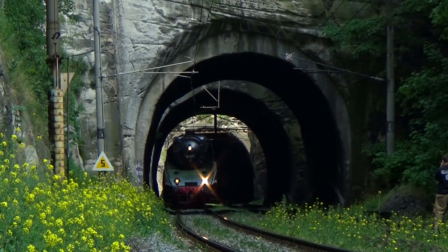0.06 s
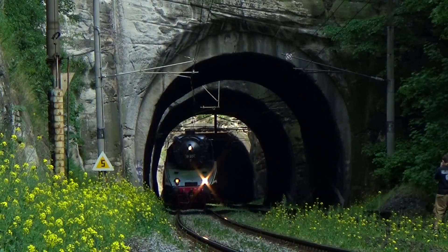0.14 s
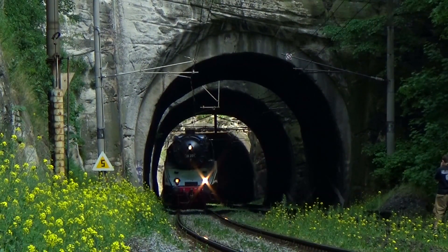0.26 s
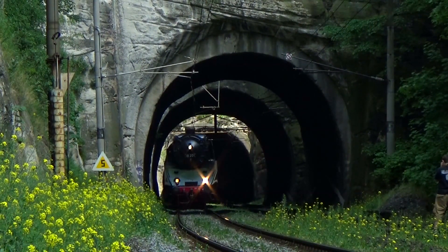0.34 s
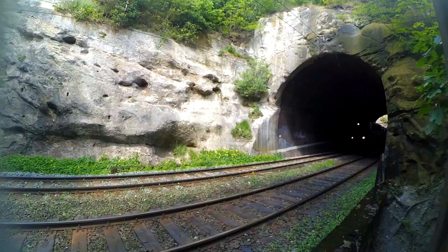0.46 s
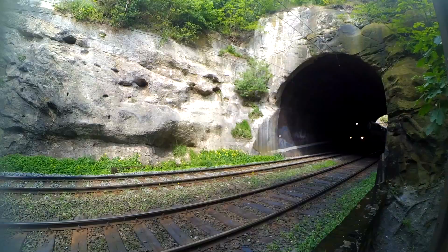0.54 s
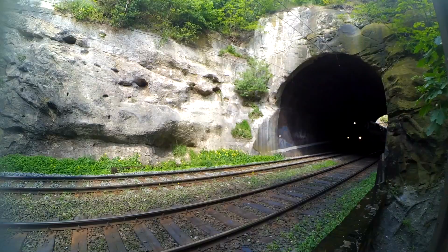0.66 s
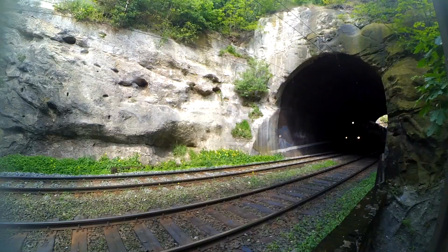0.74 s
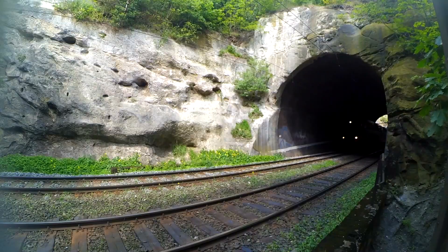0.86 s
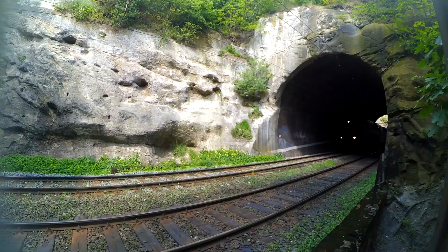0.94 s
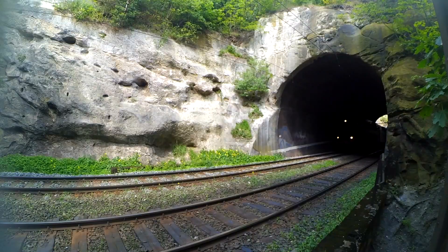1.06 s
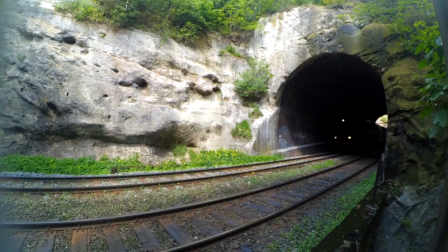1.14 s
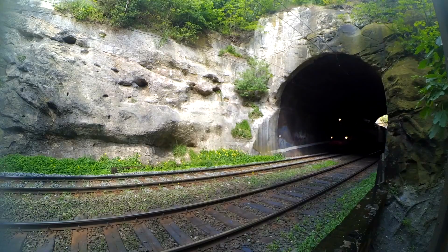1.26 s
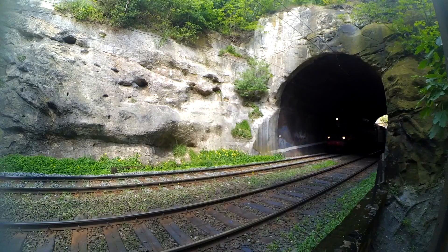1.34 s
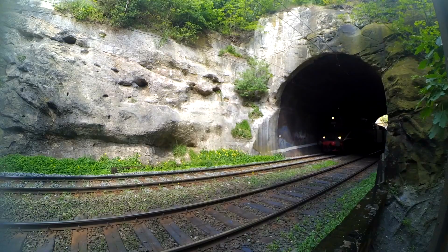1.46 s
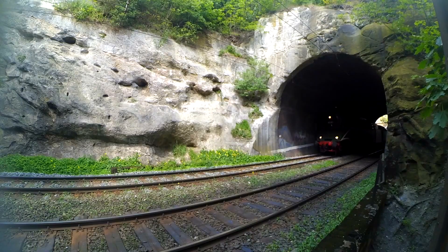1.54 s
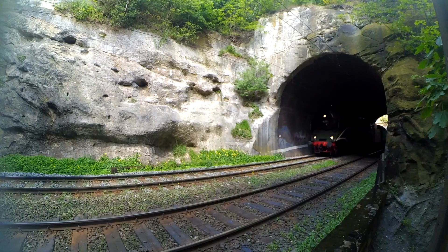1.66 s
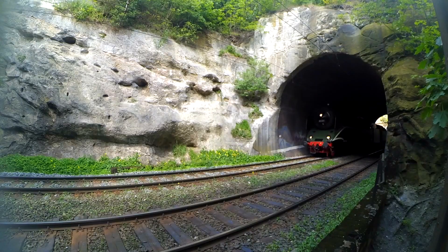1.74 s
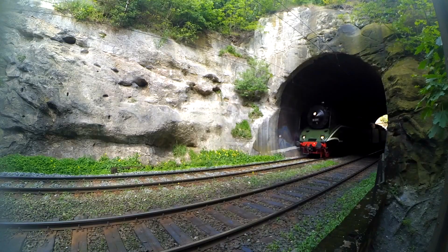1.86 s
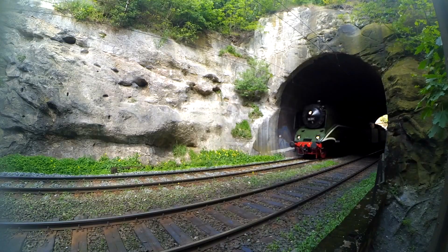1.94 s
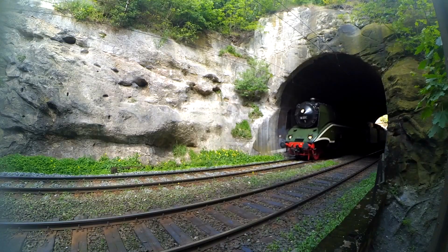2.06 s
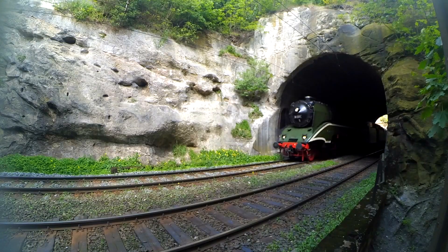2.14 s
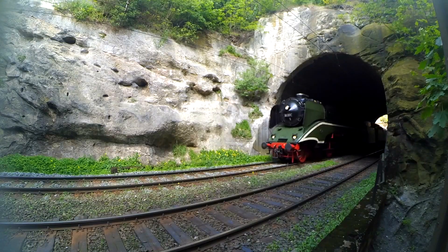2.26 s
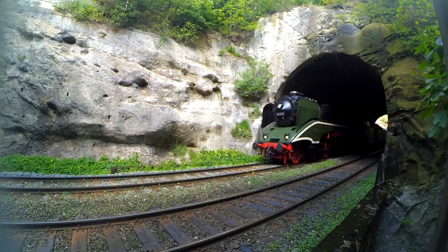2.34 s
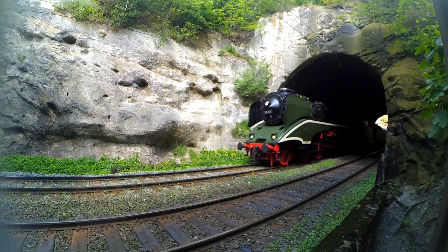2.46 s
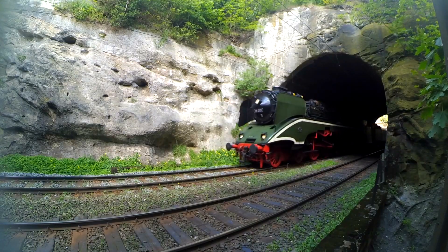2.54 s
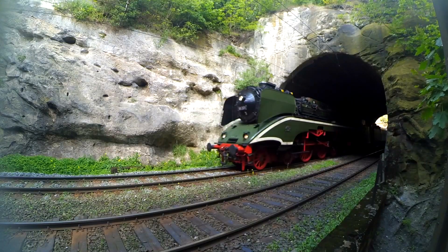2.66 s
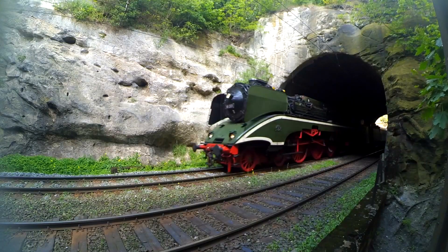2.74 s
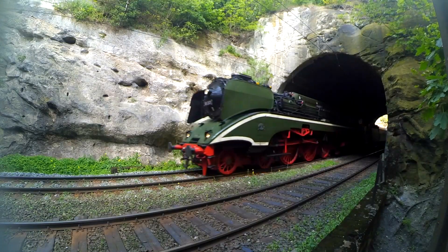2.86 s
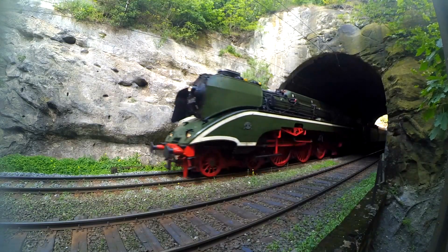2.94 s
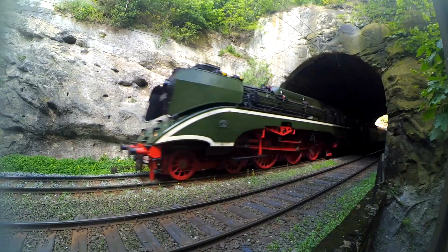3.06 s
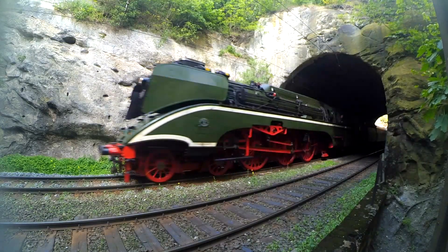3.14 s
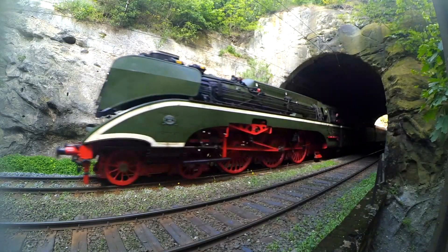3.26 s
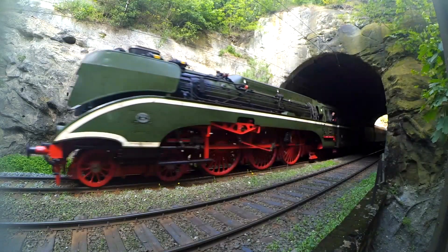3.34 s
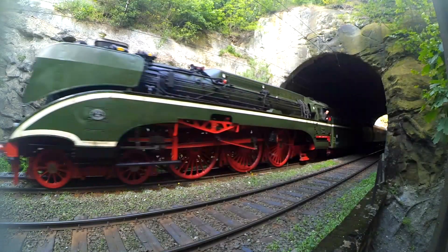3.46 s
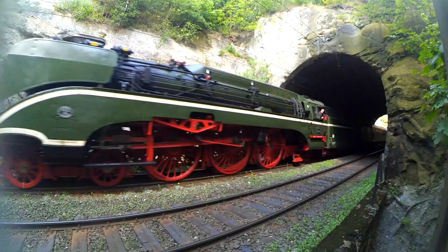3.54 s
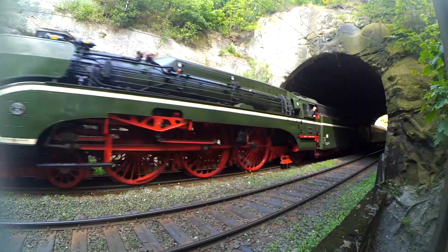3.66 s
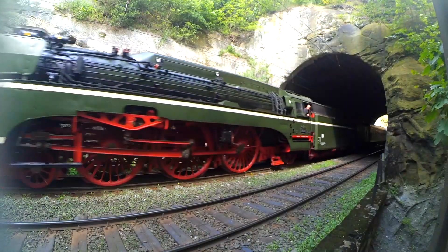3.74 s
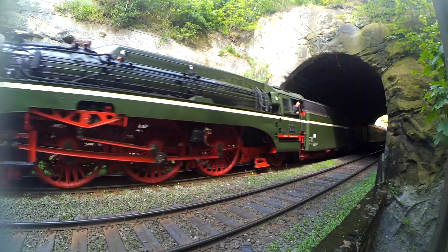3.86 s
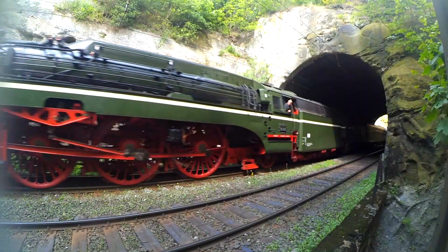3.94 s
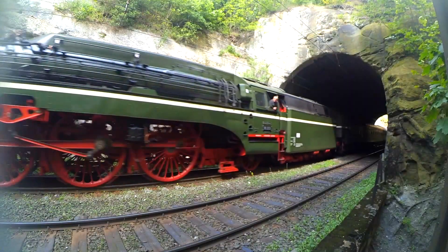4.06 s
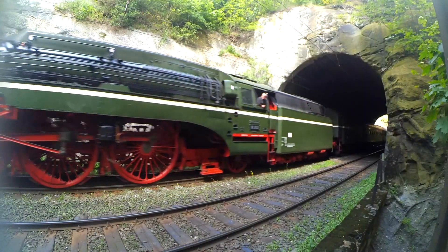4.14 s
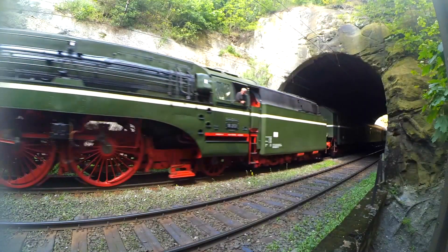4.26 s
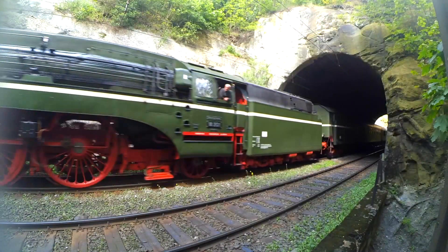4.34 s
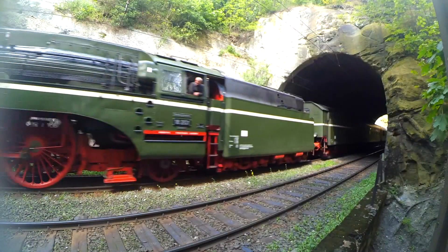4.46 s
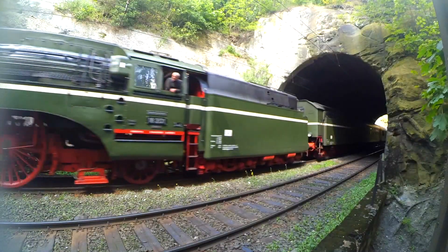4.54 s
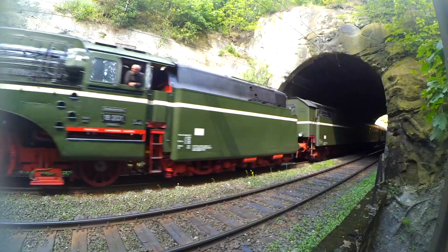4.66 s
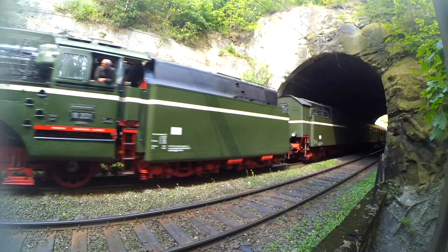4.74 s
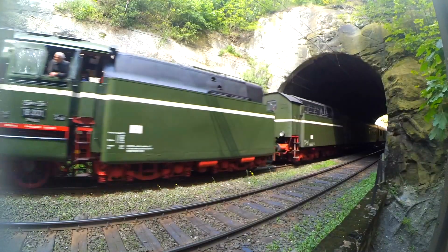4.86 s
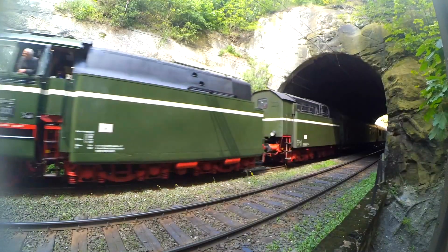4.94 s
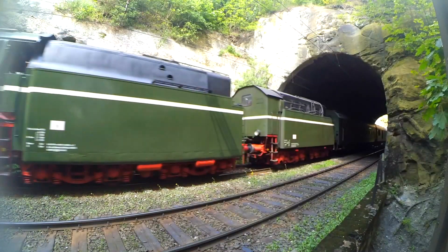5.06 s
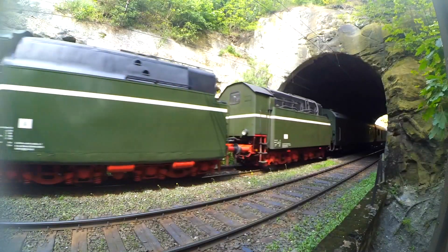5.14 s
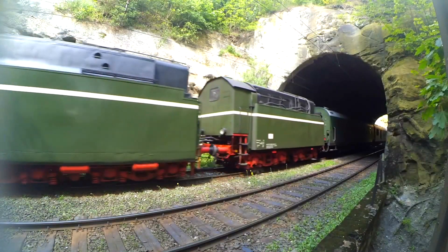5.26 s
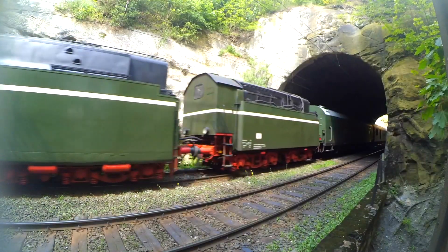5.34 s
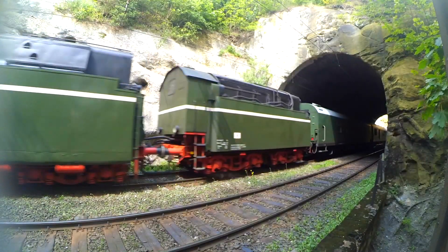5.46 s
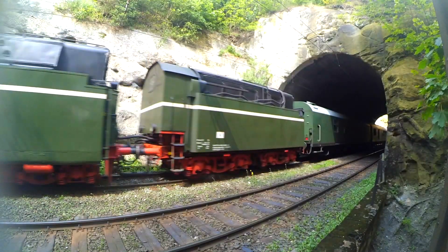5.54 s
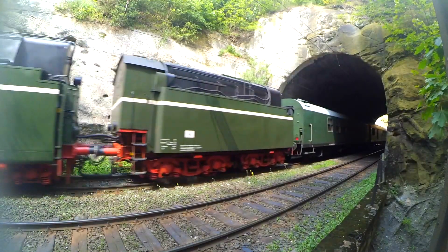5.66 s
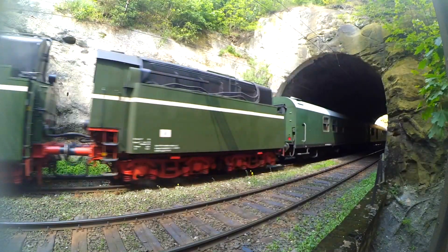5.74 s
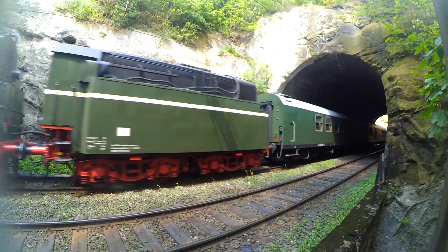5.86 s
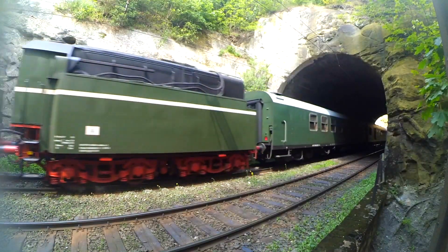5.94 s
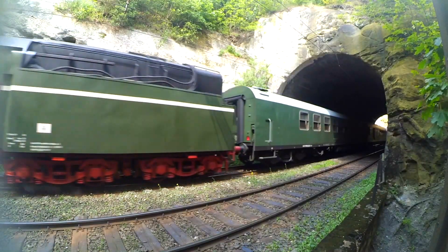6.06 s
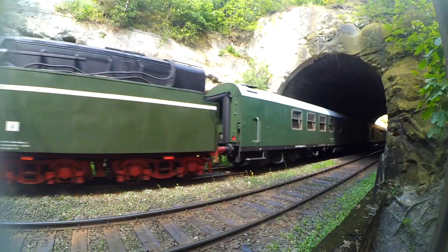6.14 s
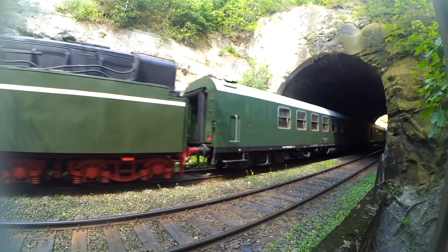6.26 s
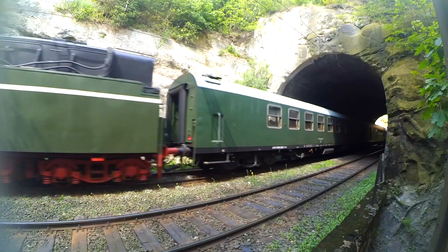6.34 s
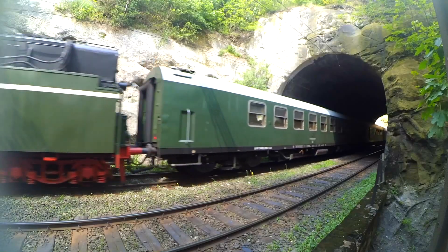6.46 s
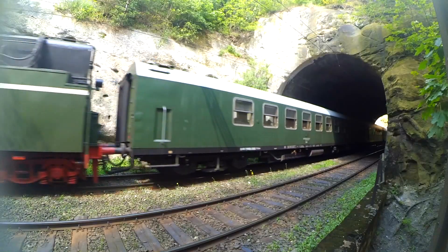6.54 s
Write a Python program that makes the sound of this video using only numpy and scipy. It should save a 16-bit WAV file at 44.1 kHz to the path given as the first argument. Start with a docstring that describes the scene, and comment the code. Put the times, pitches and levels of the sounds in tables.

```python
"""Half a second of open air with a bird, then a cut to a small camera in a closed plastic case beside the track.
A steam train rolls out of a rock tunnel and passes: a deep rumble, steam puffs, roar and hiss of wheels.
The rumble is noise in the case's low resonances; steam and wheels are noise shaped by its higher peaks.
As the tenders pass, a swelling sine makes the case boom, and impulses ring it as it chatters on its mount.
The bird whistles on over the train, as gliding tones with a noise echo."""
import sys
import numpy as np
from scipy import signal
from scipy.fft import rfft, irfft
from scipy.io import wavfile
from scipy.ndimage import uniform_filter1d

SR = 44100
rng = np.random.default_rng(int(sys.argv[2]) if len(sys.argv) > 2 else 0)


def put_to_file(sound):
    """Save the sound as 16-bit audio at rate SR, in the file named by the first command-line argument."""
    columns = np.atleast_2d(sound).T  # one column per channel
    safe = np.clip(columns, -1, 1)
    whole_steps = np.round(safe * 32767)
    wavfile.write(sys.argv[1], SR, whole_steps.astype(np.int16))


N = 291060
TIME, FREQ = np.arange(N) / SR, np.fft.rfftfreq(N, 1 / SR)

CUT_S = 0.478  # the open-air view gives way to the cased camera beside the track
BOOM_HZ, BOOM_TROUGH_S = 78.7, 5.635  # pitch of the boom, and the time of one of its troughs
# ground shaking, which jumps as the engine clears the tunnel: time_s, level_db against the close pass
GROUND_SHAKE = [(.48, -21.5), (1.2, -17.5), (2.0, -14.5), (2.74, -11.5), (2.8, -5.5), (3.5, -2.5),
                (4.2, -1.5), (5.0, 0), (6.05, 1.5), (6.6, -2)]
# swell of the case's boom: time_s, rms level_db
BOOM_SWELL = [(5.19, -33), (5.24, -27.5), (5.41, -22.5), (5.5, -23.5), (5.6, -19), (5.78, -25), (5.83, -33),
              (5.9, -35)]
# hard jolts that set the case chattering: start_s, force_db, rebound_loss_db
HARD_JOLTS = [(3.6, -38, 15), (3.669, -38.5, 13), (3.865, -36, 10), (4.635, -40, 11), (4.765, -32, 12),
              (4.963, -22.5, 18), (5.255, -31, 4), (5.317, -28, 16), (5.341, -26.5, 5), (5.392, -22.5, 5),
              (5.443, -22, 2.5), (5.532, -20, 4), (5.582, -21.5, 1), (5.659, -22.5, 2), (5.722, -19, 10),
              (5.761, -22, 5), (5.798, -24.5, 5), (5.852, -27, 6), (5.915, -26, 14), (5.991, -28.5, 19),
              (6.144, -31.5, 2.5), (6.192, -32.5, 11), (6.269, -32.5, 3)]


def amp(db):
    """Decibels to gain."""
    return 10 ** (np.asarray(db) / 20)


def unit(x):
    """Scales to rms 1."""
    return x / np.sqrt(np.mean(x ** 2) + 1e-20)


def level(rows, axis=1):
    """One dB column of a curve over time, as a gain at every sample."""
    rows = np.array(rows)
    return amp(np.interp(TIME, rows[:, 0], rows[:, axis]))


def colour(points):
    """A spectrum as a gain at every frequency, joined along a log pitch axis."""
    hz, db = np.transpose(points)
    return amp(np.interp(np.log(FREQ + 1), np.log(hz + 1), db))


def resonances(modes):
    """Gain of a set of steep-sided resonances, summed in power."""
    power = 0
    for hz, width, db in modes:
        power = power + (amp(db) / (1 + (2 * (FREQ - hz) / width) ** 2)) ** 2
    return np.sqrt(power)


def band(centre_hz, width_hz):
    """Gain of a bell-shaped band, down to 1/e at width_hz from its centre."""
    return np.exp(-((FREQ - centre_hz) / width_hz) ** 2)


def noise(gain):
    """Noise of rms 1 with the given spectrum."""
    return unit(irfft(rfft(rng.standard_normal(N)) * gain, N))


def flutter(rate_hz, depth_db):
    """A random wavering gain: slow noise, depth_db rms, moves the level."""
    return amp(depth_db * noise(band(0, rate_hz)))


def steady(x, size):
    """Evens out slow swells over a window of size samples, keeping the fast beats."""
    power = uniform_filter1d(uniform_filter1d(x ** 2, size), size)
    return x / np.sqrt(power + 1e-6)


def add(mix, s, sound):
    """Mixes a sound in at time s."""
    part = mix[max(round(s * SR), 0):][:len(sound)]
    part += sound[:len(part)]


def case():
    """Gain of the plastic shell on steam and wheels: its peaks add up in dB."""
    # peaks of the shell: pitch_hz, width_hz, gain_db
    shell_peaks = [(540, 5.7, 6.5), (820, 17, 7), (983, 64, 14.5), (1207, 55, 8), (1375, 100, 10.5),
                   (1941, 187, 14.5), (2292, 170, 10), (2716, 148, 9), (3030, 424, 8), (3816, 270, 7.5),
                   (4750, 160, 5.5), (5225, 190, 6), (6800, 400, 8.5), (7640, 280, 5), (8760, 315, 3),
                   (10800, 440, -0.5)]
    return amp(sum(db * band(hz, width) for hz, width, db in shell_peaks))


def open_air(air_db=-51):
    """The air of the place before the cut: steady noise, strongest in the bass."""
    # spectrum of the open air: pitch_hz, relative_db per Hz
    air_spectrum = [(15, -52), (25, -16), (55, -1.5), (99, -22), (152, -17), (253, -6), (803, -6.5),
                    (1710, -11.5), (2010, -13), (2420, -12), (3530, -21.5), (4740, -23.5), (6730, -28.5),
                    (9040, -30), (15500, -38)]
    return amp(air_db) * noise(colour(air_spectrum))


def birds(echo_db=-4, echo_t60=0.65, waver=0.0071):
    """Thin gliding whistles with a slightly wavering pitch, smeared by the rock face as a decaying noise tail."""
    # whistles: start_s, length_s, start_hz, middle_hz, end_hz, level_db
    whistles = [(.24, 0.064, 5880, 5300, 4900, -67), (0.256, 0.1, 5230, 4660, 5020, -63),
                (0.336, 0.074, 5030, 4680, 4570, -70), (0.5, 0.1, 2820, 3020, 3250, -64),
                (0.688, 0.121, 5200, 5160, 5080, -60.5), (1.218, 0.133, 5160, 5080, 5040, -65),
                (1.762, 0.19, 5120, 5070, 5100, -64), (1.985, .06, 6700, 6530, 6300, -66),
                (2.07, 0.06, 3990, 3970, 4000, -61), (2.785, 0.088, 5220, 5180, 5130, -65)]
    out, wobble = np.zeros(N), noise(band(0, 120))
    for s, length, first, middle, last, db in whistles:
        u = np.linspace(0, 1, round(length * SR))
        glide = np.interp(u, [0, .5, 1], [first, middle, last])
        hz = glide * (1 + waver * wobble[round(s * SR):][:len(u)])
        tone = np.sqrt(2) * np.sin(2 * np.pi * np.cumsum(hz) / SR)
        add(out, s, amp(db) * signal.windows.tukey(len(u), .7) * tone)
    tail = rng.standard_normal(SR // 2) * amp(-60 * TIME[:SR // 2] / echo_t60)
    echo = signal.oaconvolve(out, tail / np.linalg.norm(tail))[:N]
    return out + amp(echo_db) * echo


def pips(pip_db=-74.5, pip_hz=11020, width_hz=380, half_length=0.018, stray_s=0.013):
    """A faint high fizz, a narrow noise band, comes and goes about six times a second."""
    first_s, period_s = .6, .16
    beats = np.arange(first_s, N / SR, period_s)
    beats = beats + stray_s * rng.standard_normal(len(beats))
    gate = sum(np.exp(-((TIME - s) / half_length) ** 2) for s in beats)
    return amp(pip_db) * gate * noise(band(pip_hz, width_hz))


def flanges(width_hz=90):
    """The flanges rub the curved rail and ring faintly: narrow noise bands that swell and fade."""
    # thin squeals of wheel flanges in the curve: middle_s, half_length_s, pitch_hz, level_db
    squeals = [(4.55, 0.33, 8080, -69.5), (4.44, .06, 12500, -73), (4.45, .06, 14200, -73),
               (4.2, .06, 14200, -79), (4.72, .12, 14100, -82), (6.28, 0.11, 13550, -81)]
    out = np.zeros(N)
    for s, half, hz, db in squeals:
        swell = np.exp(-((TIME - s) / half) ** 2)
        out += amp(db) * swell * noise(band(hz, width_hz))
    return out


def steam():
    """Short spluttering puffs: cuts of one jet of noise, heard through the shell, that swell and die."""
    # puffs: peak_s, level_db, rise_s, decay_s, low_edge_hz
    puffs = [(.915, -46.5, .03, 0.13, 2630), (1.149, -49, 0.01, 0.032, 2800),
             (1.195, -46.5, 0.011, 0.051, 2830), (1.24, -48, 0.02, 0.077, 2950),
             (1.47, -57, 0.052, .05, 2830), (1.525, -56.5, 0.027, 0.13, 2800),
             (3.345, -51, 0.027, 0.067, 2370), (3.41, -52.5, 0.018, 0.029, 2400),
             (3.76, -54, 0.015, 0.018, 890), (4.2, -42.5, 0.033, 0.051, 830)]
    # spectrum of the jet ahead of the shell: pitch_hz, relative_db per Hz
    jet_spectrum = [(800, 5.5), (2000, -1.5), (3000, 1), (3700, 7), (4300, 2.5), (4900, 3.5), (6500, -2.5),
                    (8000, -9.5), (10000, -16.5), (14500, -24)]
    out, jet = np.zeros(N), rfft(rng.standard_normal(N)) * colour(jet_spectrum) * case()
    for s, db, rise, decay, low_hz in puffs:
        before, after = np.minimum(TIME - s, 0), np.maximum(TIME - s, 0)
        shape = np.exp(-(before / rise) ** 2 - after / decay)
        high_pass = 1 / np.sqrt(1 + (low_hz / (FREQ + 1)) ** 14)
        puff = unit(irfft(jet * high_pass, N))
        out += amp(db) * shape * np.roll(puff, rng.integers(N))  # each puff takes another stretch of the jet
    return out * flutter(120, 1.2)


def wheels(roar_db=-50.5, singing_db=-55.0, hiss_db=-52, hiss_follow=0.72):
    """Rough wheels on steel, through the shell: an uneven roar, the singing of the rails and a wide hiss."""
    # the train nears on the rails: time_s, rolling_db, singing_db, both against the close pass
    approach = [(.48, -12.5, -9), (1.3, -10, -8), (2.4, -9, -9), (2.85, -6, -4.5), (3.7, -1.5, .5),
                (4.5, -1.5, -.5), (5.1, -1, -2.5), (5.6, 0.5, 2), (6.0, 0, -2), (6.6, -0.5, -0.5)]
    # spectra ahead of the shell: pitch_hz, relative_db per Hz
    roar_spectrum = [(120, 2), (200, -1.5), (330, 1), (410, -2), (470, -5.5), (700, -8), (900, -16.5),
                     (1300, -47)]
    singing_spectrum = [(600, 4), (900, -2.5), (1100, 3.5), (1650, 3), (2100, -49)]
    hiss_spectrum = [(1300, -18), (1800, -1), (2500, 2.5), (3500, 1.5), (6000, -2.5), (8000, -7),
                     (10000, -9.5), (12500, -15), (14800, -19), (15600, -33)]
    shell, roll = case(), level(approach)
    roar = amp(roar_db) * roll * noise(colour(roar_spectrum) * shell) * flutter(28, 1.9)
    rails = noise(colour(singing_spectrum) * shell) * flutter(27, 0.18)
    singing = amp(singing_db) * level(approach, axis=2) * rails
    hiss = amp(hiss_db) * roll ** hiss_follow * noise(colour(hiss_spectrum) * shell) * flutter(30, 0.64)
    return roar + singing + hiss


def rumble(sway_db=-39.5, sway_follow=0.61, main_db=-33.5, main_follow=1.15,
           box_db=-34.0, box_under_boom_db=-6, handover_db=-28):
    """Ground and air shake the case; its low resonances beat, until the main one takes over as a boom."""
    # low resonances of case and mount, and of a wavering hum: pitch_hz, width_hz, relative_db
    sway_mode = [(51.4, 14.7, 0)]
    main_mode = [(76.9, 12.1, 0)]
    box_modes = [(94.1, 14.5, 1), (105.4, 11.4, -0.5), (133, 44, -23), (141, 21, -20), (163.3, 20, -20),
                 (222, 13.3, -23.5)]
    hum_mode = [(260.6, 19, 0)]
    # level of the hum: time_s, level_db
    hum_level = [(.48, -81), (1.25, -67), (2.35, -66.5), (2.55, -56), (4.2, -57), (6.6, -57.5)]
    shake = level(GROUND_SHAKE)
    sway = steady(noise(resonances(sway_mode)), size=3500) * flutter(4.7, 1.57)
    sway *= amp(sway_db) * shake ** sway_follow
    booming = (TIME > BOOM_SWELL[0][0]) * (TIME < BOOM_SWELL[-1][0])
    swing = uniform_filter1d(level(BOOM_SWELL) * booming, size=500)
    takeover = np.clip(swing / amp(handover_db), 0, 1) ** 2  # 1 where the boom has replaced the main beating
    main = steady(noise(resonances(main_mode)), size=3000) * flutter(2.3, 1.8)
    main *= (1 - takeover) * amp(main_db) * shake ** main_follow
    box = steady(noise(resonances(box_modes)), size=3000) * flutter(5.7, 2.13)
    box *= amp(box_db + takeover * box_under_boom_db) * shake
    boom = -np.sqrt(2) * swing * np.cos(2 * np.pi * BOOM_HZ * (TIME - BOOM_TROUGH_S))
    hum = level(hum_level) * steady(noise(resonances(hum_mode)), size=4000) * flutter(3, 2.7)
    return sway + main + box + boom + hum


def thuds(thud_db=-8, thud_t60=0.34, rise_s=0.0015):
    """Each hard jolt also kicks the main resonance into a short, dying swing."""
    out, t = np.zeros(N), TIME[:SR // 2]
    decay = (1 - np.exp(-t / rise_s)) * amp(-60 * t / thud_t60)
    swing = -decay * np.sin(2 * np.pi * BOOM_HZ * t)
    for s, db, _ in HARD_JOLTS:
        add(out, s, amp(db + thud_db) * swing)
    return out


def jolts(bumps_per_s=6, bump_db=-46.5, bump_loss_db=19, spread_db=3):
    """The hard jolts, and small random bumps that grow with the shaking: rows like those of HARD_JOLTS."""
    at = np.flatnonzero(rng.random(N) < bumps_per_s / SR)
    # bump_db holds at the close pass
    db = bump_db + 20 * np.log10(level(GROUND_SHAKE)) + spread_db * rng.standard_normal(N)
    return HARD_JOLTS + [(TIME[k], db[k], bump_loss_db) for k in at]


def rattle(knock_db=-5.5, slack=0.027, lead_s=0.00195, uneven_db=3, late_s=0.00035):
    """Where the boom's level exceeds the slack of the mount, the case strikes it each swing: times and forces."""
    first = np.ceil((BOOM_SWELL[0][0] - BOOM_TROUGH_S) * BOOM_HZ)
    swings = np.arange(first, (BOOM_SWELL[-1][0] - BOOM_TROUGH_S) * BOOM_HZ)
    late, size = rng.standard_normal((len(swings), 2)).T
    at = BOOM_TROUGH_S - lead_s + swings / BOOM_HZ + late_s * late  # shortly before each trough
    excess = np.maximum(np.interp(at, TIME, level(BOOM_SWELL)) - slack, 0)
    return at, excess * amp(knock_db + uneven_db * size)


def chatter(knock_db=0, blunt_hz=1100, release_s=0.00506, release_db=-9, late_s=0.00039):
    """The case knocks on its mount once a swing: in the boom, and ever more weakly after each jolt."""
    # what one knock rings with: pitch_hz, relative_db, t60_s
    knock_modes = [(266, -20, 0.2), (264, -19, 0.11), (313.3, -14, 0.26), (343, -0.5, 0.11),
                   (394.5, -7, 0.085), (419, -12.5, 0.3), (576.5, -5.5, 0.086), (618, 0, 0.016),
                   (712, -5.5, 0.071), (790, -14.5, 0.039), (863, -18.5, 0.044), (940, -31, 0.019),
                   (960, -37, .035)]
    knocks, bounce = np.zeros(N), np.arange(5)
    runs = [rattle()]
    for s, db, loss_db in jolts():
        late = late_s * rng.standard_normal(len(bounce)) * (bounce > 0)  # the first knock is on time
        runs.append((s + bounce / BOOM_HZ + late, amp(db - loss_db * bounce)))
    for at, force in np.hstack(runs).T:
        add(knocks, at, [force])
        add(knocks, at + release_s, [force * amp(release_db)])  # it springs free again
    t = TIME[:SR // 8]
    ring = sum(amp(db - 60 * t / t60) * np.sin(2 * np.pi * hz * t) for hz, db, t60 in knock_modes)
    sound = signal.oaconvolve(knocks, -ring / abs(ring).max())[:N]
    soft = 1 / np.sqrt(1 + (FREQ / blunt_hz) ** 20)  # the blunt contact leaves no treble
    return amp(knock_db) * irfft(rfft(sound) * soft, N)


def scene():
    """Open air, then the train at the cased camera, with the bird over both; alike in both channels."""
    cased = np.clip((TIME - CUT_S) / .006 + .5, 0, 1)  # a 6 ms crossfade
    train = pips() + flanges() + steam() + wheels() + rumble() + thuds() + chatter()
    mono = (1 - cased) * open_air() + cased * train + birds()
    return np.array([mono, mono])


def record(dry, edge_hz=15650):
    """The band limit of the camera: a steep low-pass."""
    low_pass = signal.firwin(511, edge_hz, window=("kaiser", 9), fs=SR)
    return signal.oaconvolve(dry, low_pass[None], "same")


dry = scene()
out = record(dry)
put_to_file(out)
```